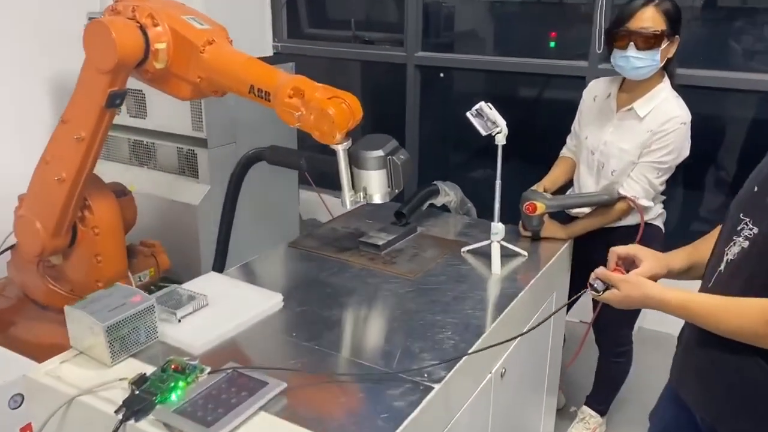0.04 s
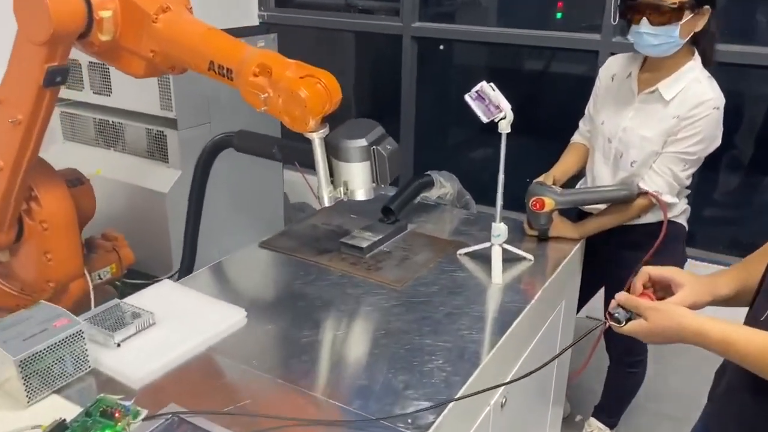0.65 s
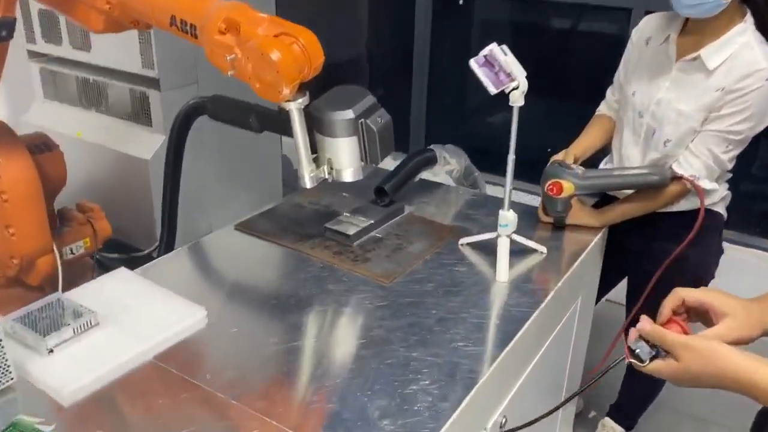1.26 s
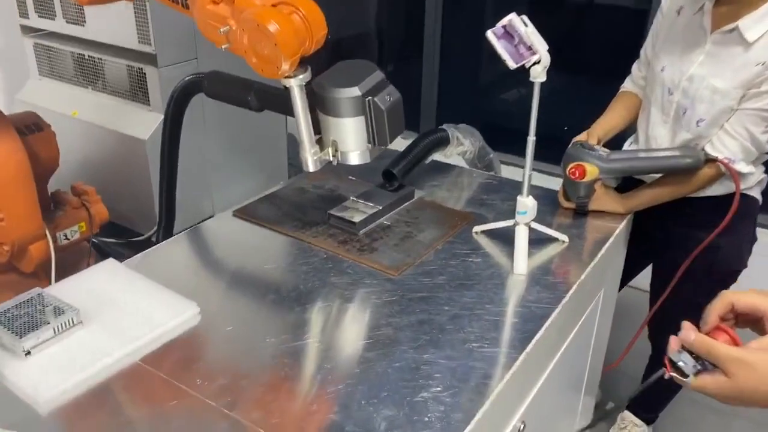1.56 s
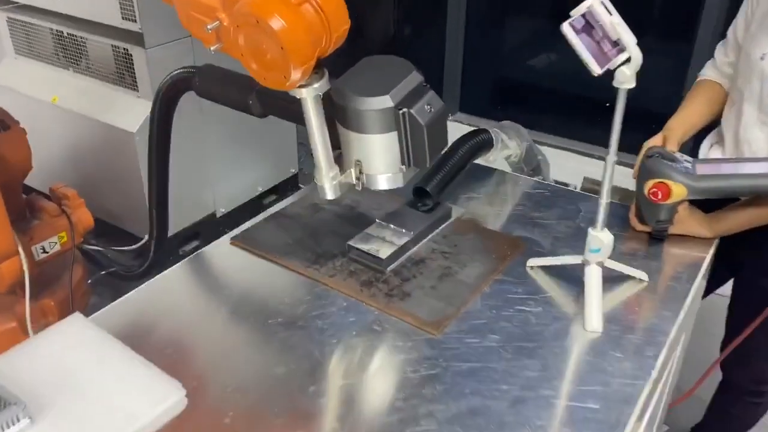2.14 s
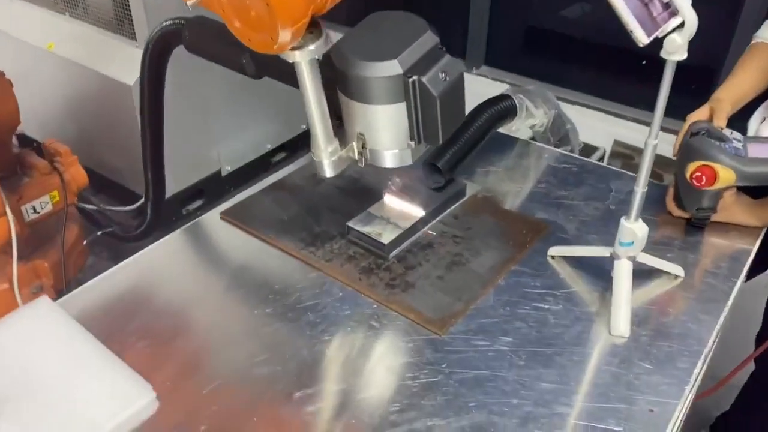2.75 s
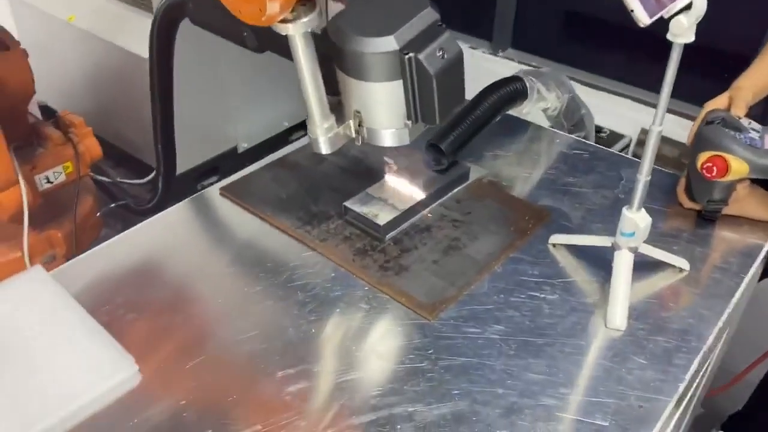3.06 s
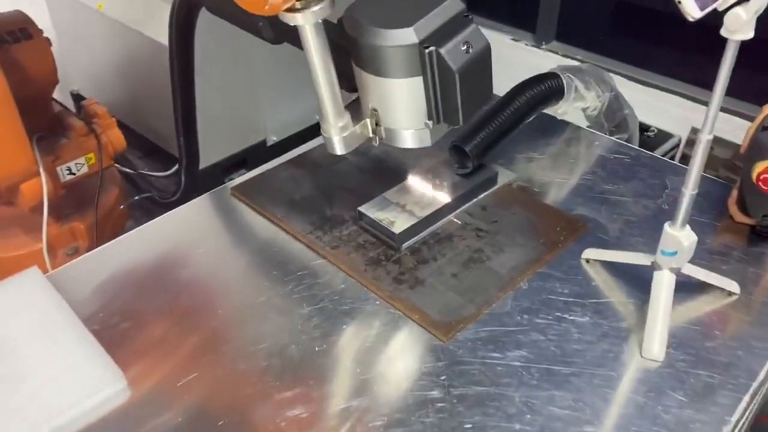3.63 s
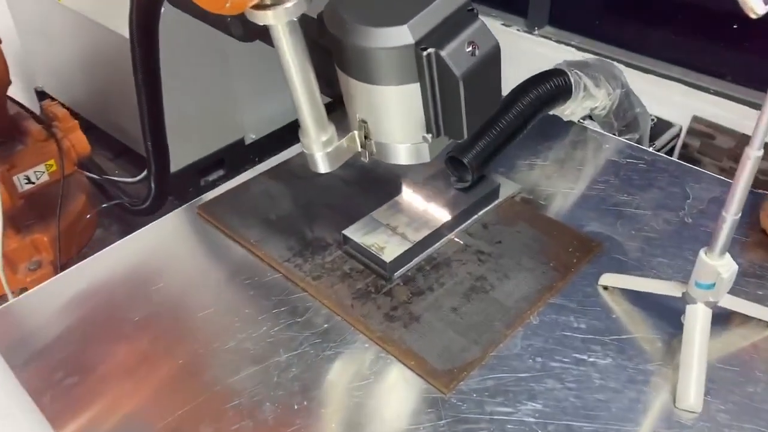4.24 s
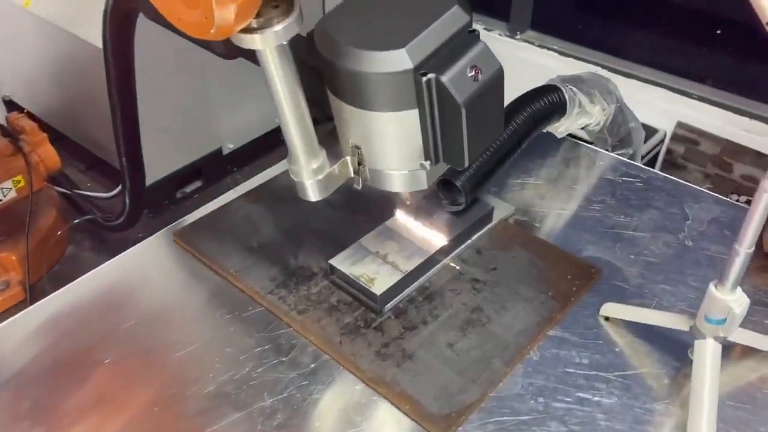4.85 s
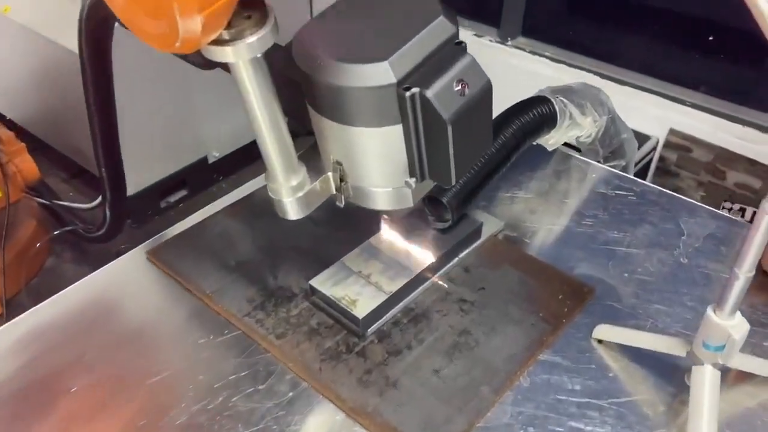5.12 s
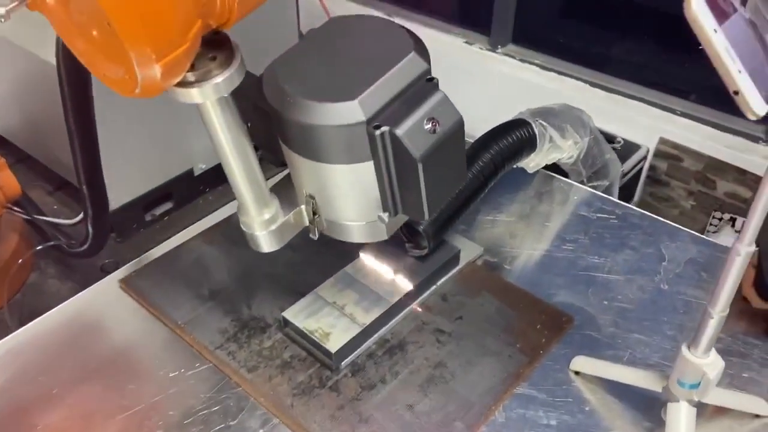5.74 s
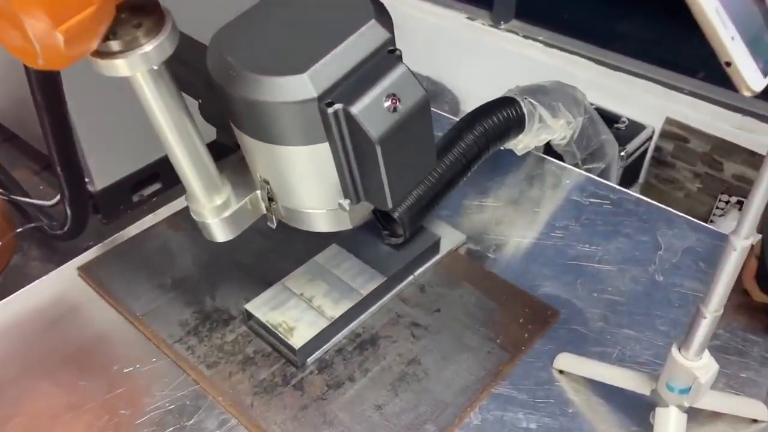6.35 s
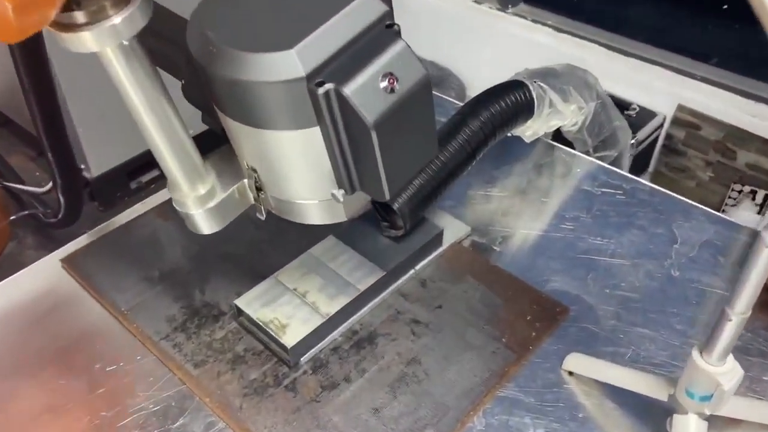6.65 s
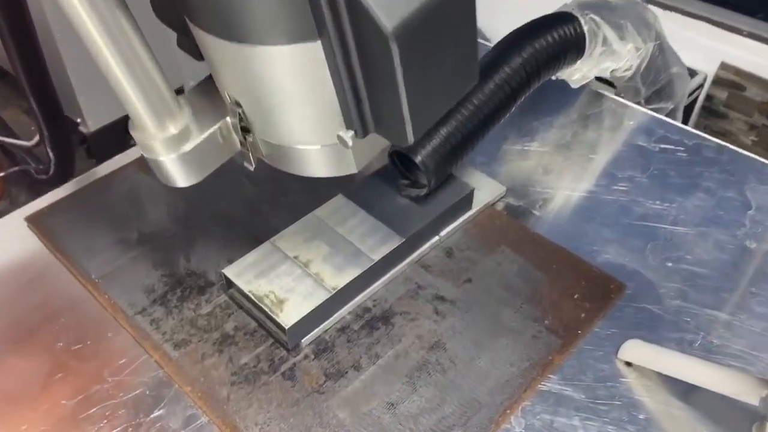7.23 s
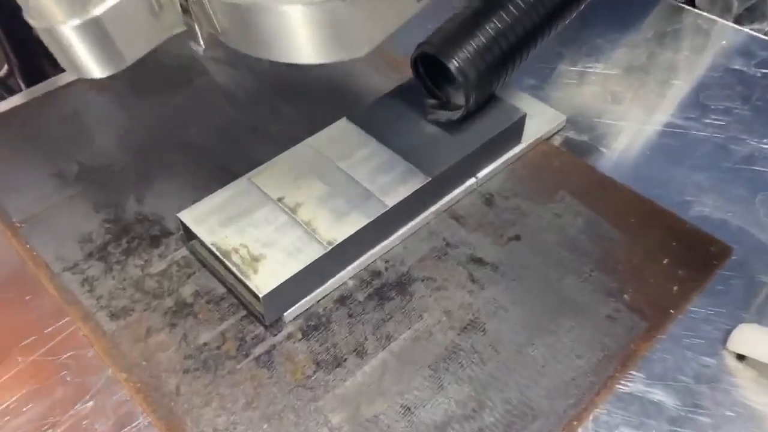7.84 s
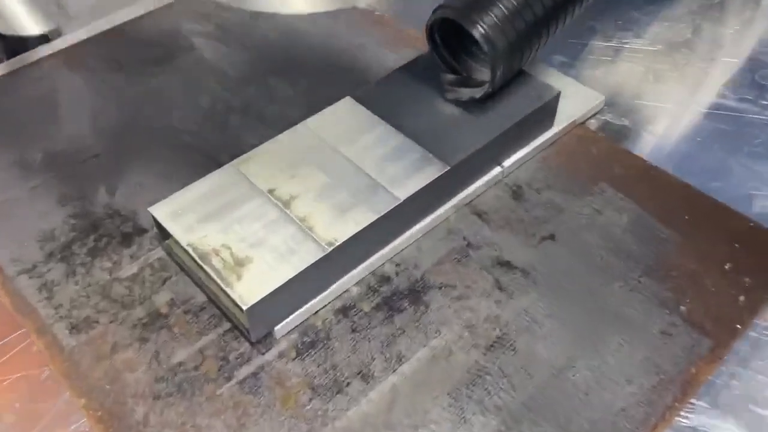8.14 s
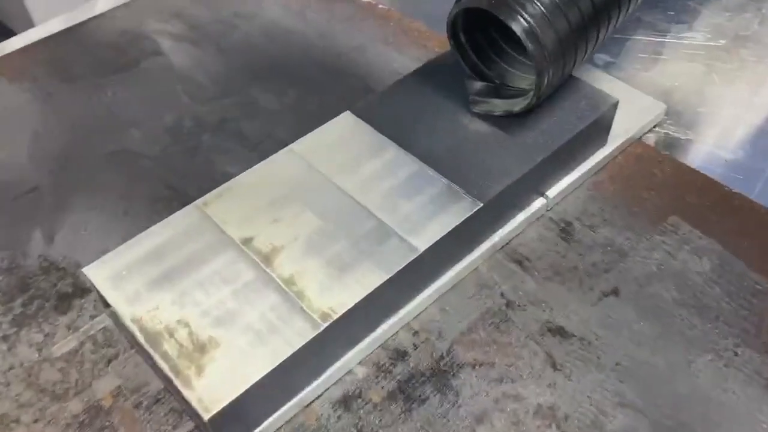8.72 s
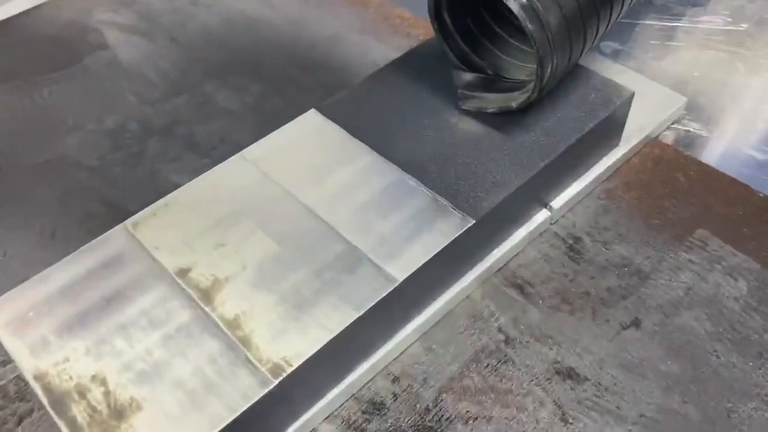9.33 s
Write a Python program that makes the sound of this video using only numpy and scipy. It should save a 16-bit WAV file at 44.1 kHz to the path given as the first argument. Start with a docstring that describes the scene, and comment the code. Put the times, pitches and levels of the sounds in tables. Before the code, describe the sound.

Heard in stereo, carried close to a steel bar in a workshop: first loud, humming fan noise with a clack and a scuff nearby. After about two seconds the fans drop away and a cleaning laser takes over, popping and thumping, then sizzling with a lighter, raspy buzz. Near six seconds it dies out. Quiet fan noise creeps back, along with the faint, airy whistle of an extraction hose.

```python
"""A workshop full of fan and extractor noise, on a stereo pair carried close to a steel bar.
A robot-held cleaning laser strips the bar's coating in puffs of vapour and popping flakes. The beam
sweeps to and fro over nearly the same specks, so its crackle repeats as a raspy buzz.
The far fans sink away as the laser starts and creep back after it stops; a few things clack nearby.
Last, the microphones close in on the faint, hollow whistle of the extraction hose."""
import sys
import numpy as np
from scipy import signal
from scipy.fft import rfft, irfft
from scipy.io import wavfile

SR = 44100
rng = np.random.default_rng(int(sys.argv[2]) if len(sys.argv) > 2 else 0)


def transcribe(u):
    """Save the signal u as a 16-bit wav file named by the first command-line argument.

    u: samples, shape (n,) or (channels, n), limited to [-1, 1]; the rate is SR.
    q: integer samples, one column per channel.
    """
    v = np.clip(np.atleast_2d(u).T, -1, 1)
    q = np.round(v * 32767).astype(np.int16)
    wavfile.write(sys.argv[1], SR, q)


N = 413658
TIME, FREQS = np.arange(N) / SR, np.fft.rfftfreq(N, 1 / SR)

# the workshop's reverberation: (frequency [Hz], time to fall 60 dB [s])
ROOM_T60 = [(100, 0.44), (1000, 0.33), (5000, 0.43), (15000, 0.097)]
# likeness of left and right, for moving air and for echoes: (frequency [Hz], correlation [-1 to 1])
AIR_LIKENESS = [(100, 1), (290, 0.9), (640, 0.44), (1300, 0.11), (3000, 0.39), (6500, 0.28), (12000, 0.038)]
ECHO_LIKENESS = [(60, 0.22), (200, 0.047), (400, 0.37), (700, -0.4), (1300, -0.89), (2500, 0.12),
                 (5000, -0.12), (9000, 1), (15000, -0.49)]
# how the microphones differ, far off and close up: (frequency [Hz], left louder [dB], left leads [rad])
FAR_MICS = [(300, -0.5, 0.27), (850, 3, 0.57), (1410, 0.5, 1), (2000, 1.5, 0.42), (2820, -0.5, .8),
            (3800, 0.5, 0.3), (5400, 5, 0.87), (7000, 0.7, 0.068), (8500, 0.5, 0.34)]
NEAR_MICS = [(100, -0.4, 0), (400, 0.8, 0.089), (720, 4, 0.7), (1440, -3, 0.92), (1910, 1.5, 0),
             (2900, 3, 1), (3970, 2, 0.012), (5260, 3.5, 0.93), (6500, -1, 0.58)]
# far fans before the burn, rows rumble, rush, hiss:
# (level [dB], brief dip [dB], swell [dB], sinks from [s], sink rate [dB/s])
FANS_LOUD = [(-28.5, -7, -.5, 2.265, 244), (-36.5, -4, -0.75, 2.252, 140), (-43.5, -1.5, 2, 2.236, 108)]
# far fans after the burn, same rows: (level [dB], creep [dB/s], step up [dB])
FANS_FAINT = [(-73, 1.86, 12), (-71, 1, 2), (-77, 4, 0)]
# colour of the loud and of the faint fans: (frequency [Hz], relative level [dB])
LOUD_AIR = [(20, -39), (36, -20), (48, -13), (62, -5), (130, -2.5), (250, -3.5), (490, -5.5), (650, -8),
            (1150, -6), (1500, -12), (2700, -16), (3600, -22.5), (7000, -35), (8500, -35.5), (15000, -39.5)]
FAINT_AIR = [(20, -33.5), (37, -23), (48, -14), (68, -13.5), (110, -3.5), (200, -6.5), (260, -8), (370, -5),
             (430, -9.5), (560, -13.5), (1050, -17), (2100, -24), (2800, -26), (4000, -28.5), (4850, -25),
             (6200, -20.5), (7500, -19.5), (14300, -21.5), (15500, -30)]
# narrow fan tones: (frequency [Hz], width [Hz], prominence before the burn [dB], after it [dB])
FAN_TONES = [(113, 4, 5, 0), (145, 7, 4, 3), (168, 7, -8, 0), (204, 8, -4, 1), (345, 14, -3, -8),
             (474, 6, 1, 1), (499, 6, 1, -8), (890, 10, -3, -1), (1178, 8, 4, 2), (1472, 6, 5, 6),
             (1820, 8, 2, -8), (1868, 7, 6, -8), (2164, 6, 7, -8), (2595, 7, -6, 3), (2751, 6, 6, -6),
             (2945, 6, 3, 6), (14120, 14, 5, -8), (14217, 14, 5, -8)]
# hum of a fan's shaft and blades: (frequency [Hz], level before the burn [dB], after [dB], return [s])
FAN_HUM = [(48.5, -48, -68.5, 7.45), (387.4, -44.5, -67, 7.18), (773, -56, -82, 7.4)]
# room resonances along the microphones' path:
# (time [s], half length [s], frequency [Hz], width [Hz], level [dB])
ROOM_BLOOMS = [(0.45, 0.049, 468, 55, -32.5), (0.7, 0.16, 473, 50, -35), (0.58, 0.26, 350, 57, -39),
               (0.35, 0.35, 2850, 350, -53.5), (0.65, 0.14, 834, 330, -41), (1.02, 0.069, 137, 26, -28.5),
               (1.555, 0.55, 390.3, 11, -37.5), (2.15, 0.041, 170, 220, -30), (6.8, 0.56, 2560, 440, -77.5)]
# broad peaks in the colour of the rushing air: (frequency [Hz], width [Hz], lift [dB])
AIR_PEAKS = [(2850, 380, 3.5), (3950, 480, 5), (6700, 1300, 3.5), (10000, 2600, 3.5)]
# air whistling in the hose's mouth: (frequency [Hz], width [Hz], level when nearest [dB])
HOSE_MOUTH = [(3930, 480, -75.5), (6220, 420, -76), (6870, 500, -75.5), (7450, 450, -73.5)]
# clacks, ticks and scuffs around the bench:
# (time [s], level [dB], centre [Hz], half width [octaves], rise [s], time to fall 60 dB [s])
KNOCKS = [(0.1334, -12, 5500, 1.2, 0.0002, 0.021), (0.1388, -8.5, 4000, 1.5, 0.00007, 0.0055),
          (0.1383, -13.5, 1505, 1.9, 0.0001, 0.021), (0.1451, -19, 2600, 1.6, 0.001, 0.12),
          (0.156, -25, 1100, 1.5, 0.0011, 0.08), (1.176, -32.5, 9900, 0.14, 0.0042, 0.065),
          (1.975, -25.5, 5000, 4, 0.0068, 0.29), (1.98, -32.5, 2220, 0.11, 0.0053, 0.26),
          (6.246, -52, 8900, 0.58, 0.00027, 0.021), (6.25, -48, 3970, 0.45, 0.00025, 0.011),
          (6.82, -60.5, 5000, .8, 0.0046, 0.29), (7.769, -56, 1660, 0.61, 0.007, 0.33)]
# colour of one puff of vapour: (frequency [Hz], relative level [dB])
PUFF_COLOUR = [(20, -38), (34, -11.5), (48, -1.5), (90, 1), (150, 0), (280, -3), (550, -8.5), (1000, -16),
               (1900, -19.5), (3000, -25.5), (6000, -31), (8500, -32), (10200, -35.5), (12000, -42.5),
               (14500, -28.5)]
# flakes flashing off; at the coating's ends the beam grazes the same spot once a scan cycle:
# (time [s], relative peak [dB], thump [dB], snap [dB], cycles [count])
POPS = [(2.150, -13.5, 25, 4, 1), (2.232, -13.5, -5, 5, 1), (2.270, -13, 6, -9, 1),
        (2.318, -10.5, 17, 3, 1), (2.323, -12, -11, 1, 2), (2.361, -15.5, 6, -5, 1),
        (2.381, -26, -5, -2, 2), (2.399, -20, 9, 4, 1), (2.409, -15.5, 9, -3, 1), (2.419, -20, 11, 4, 1),
        (2.442, -18, -5, 4, 1), (2.447, -18, 8, -3, 1), (2.583, -14.5, 11, 1, 1), (2.648, -17.5, 13, 4, 1),
        (2.728, -25, 18, 0, 1), (2.768, -18.5, 18, 9, 1), (2.855, -22, 24, 4, 2), (2.926, -13.5, 29, 1, 1),
        (2.963, -19, 14, -1, 1), (2.983, -21, 8, 4, 1), (3.004, -27, 0, 15, 1), (3.035, -26, 6, 10, 1),
        (3.328, -28, -4, 3, 1), (3.416, -24.5, -8, 6, 1), (4.582, -35, 9, 6, 3), (4.646, -27, -3, 15, 1),
        (4.800, -28, 5, 6, 1), (4.948, -30, 3, 10, 1), (5.014, -29, 3, 6, 1), (5.103, -24, -5, -3, 1),
        (5.145, -28, 6, -4, 2), (5.729, -28, 7, 1, 1), (5.7494, -29, -3, 11, 5), (5.7536, -29, 3, 12, 4),
        (5.7642, -33.5, 4, 3, 5), (5.772, -25.5, -2.5, 3, 5), (5.7772, -29, -2, 1, 5),
        (5.7811, -30, -2, 4, 4), (5.988, -34.5, -13, 2, 1), (6.031, -42, -16, -1, 1)]
# overtones of the sweep: (multiple of the scan rate [ratio], level relative to the spit band [dB])
SCAN_TONES = [(2, -11), (4, -5.5), (6, -8.5), (7, -22), (8, -5), (10, -13), (11, -16.5), (12, -6.5),
              (14, -16), (16, -18.5), (18, -24), (19, -20), (20, -17), (22, -16), (24, -9), (26, -15.5),
              (27, -18), (28, -23), (30, -22), (36, -17.5)]
# how alike the surface is a cycle later, and on the next track: (frequency [Hz], likeness [0 to 1])
CYCLE_MEMORY = [(100, 0.6), (500, 0.38), (1200, 0.16), (3000, 0.065), (10000, 0.22)]
TRACK_MEMORY = [(100, 0.58), (600, 0.062), (2000, 0.0457), (5000, 0.022)]
# the close burn, rows thud, puffing, spit, rasp, sizzle: (level [dB], extra on the heavy stretch [dB],
# settling [s], share of plume swell [0 to 1], of rasp swell [0 to 1], fades from [s], fade rate [dB/s])
BURN_BANDS = [(-40.5, 13.5, 0.033, 0.9, 0.15, 5.70, 175), (-47.5, 12.5, 0.18, 0.16, 0.049, 5.70, 165),
              (-46.5, 5, 0.33, 0.033, 0.78, 5.71, 145), (-49, 2, 0.21, 0.083, 0.88, 5.71, 117),
              (-49, 3, .3, 0.068, 0.27, 5.64, 40.5)]
# swells of the plume and of the rasp, each taken about its mean: (time [s], level [dB])
PLUME_SWELL = [(3.1, -35.5), (3.2, -32.5), (3.3, -39), (3.45, -34), (3.6, -35), (3.78, -39), (3.88, -33.5),
               (4.03, -31.5), (4.22, -38), (4.4, -35.5), (4.6, -32), (4.75, -44.5), (4.88, -36.5),
               (5.1, -32.5), (5.35, -34), (5.5, -38), (5.7, -35)]
RASP_SWELL = [(3.12, -41), (3.28, -45), (3.48, -43), (3.6, -44), (3.75, -42.5), (3.95, -42.5),
              (4.12, -43.5), (4.23, -41.5), (4.36, -44.5), (4.5, -42.5), (4.65, -43), (4.76, -43.5),
              (4.9, -43), (5.12, -43), (5.32, -45.5), (5.5, -43), (5.7, -44)]

FAN_EDGES_HZ, BURN_EDGES_HZ = (600, 5000), (300, 650, 1500, 5000)  # where the bands meet
BRIGHTEN_S, BRIGHTEN_TAKES_S = 1.06, 0.38  # the air turns brighter
SCAN_HZ, SCAN_START_S = 23.125, 2.2027
BURN_FULL_S, BURN_RISE_DB_PER_S = 2.46, 187  # the beam slides onto the coating
HEAVY_END_S = 2.98  # end of the first, heavily burning stretch


def gain_of(db):
    """Decibels to amplitude."""
    return 10 ** (np.asarray(db) / 20)


def unit_rms(x):
    """Scales a sound so that its channel average has rms 1."""
    return x / np.sqrt(np.mean(np.atleast_2d(x).mean(0) ** 2) + 1e-20)


def read(points, hz):
    """Reads a table on a log-frequency axis."""
    f, value = np.transpose(points)
    return np.interp(np.log(hz + 1), np.log(f + 1), value)


def add(mix, s, sound):
    """Mixes a sound in at time s."""
    part = mix[round(s * SR):][:len(sound)]
    part += sound[:len(part)]


def step(at_s, takes_s):
    """A smooth change from 0 to 1, centred on a moment."""
    return (1 + np.tanh(2 * (TIME - at_s) / takes_s)) / 2


def fade_in(full_s, db_per_s):
    """A level in dB that climbs to 0 and stays there."""
    return -db_per_s * np.maximum(full_s - TIME, 0)


def fade_out(from_s, db_per_s):
    """A level in dB that holds at 0, then falls."""
    return -db_per_s * np.maximum(TIME - from_s, 0)


def resonance(hz, width_hz, slope=2):
    """A spectral peak of height 1."""
    return 1 / (1 + (2 * (FREQS - hz) / width_hz) ** slope)


def noise(colour, shape=N):
    """Noise with the given amplitude spectrum."""
    return irfft(rfft(rng.standard_normal(shape)) * colour)


def ride(x, levels, edges_hz, normalise=unit_rms):
    """Splits a sound into bands and lets each follow its level in dB."""
    lowpasses = [1 / (1 + (FREQS / edge) ** 8) for edge in edges_hz]
    shares = np.diff([np.zeros_like(FREQS), *lowpasses, np.ones_like(FREQS)], axis=0)
    spectrum = rfft(x)
    return sum(normalise(irfft(spectrum * share, N)) * gain_of(db) for share, db in zip(shares, levels))


def diffuse(pair, likeness):
    """Sound from all round: the two microphones hear it more or less alike at each frequency."""
    same = np.clip(read(likeness, FREQS), -1, 1)
    a, b = rfft(pair)
    mid, side = a * np.sqrt((1 + same) / 2), b * np.sqrt((1 - same) / 2)
    return irfft(np.array([mid + side, mid - side]), N)


def microphones(pair, table):
    """Gives the two microphones their difference in level and phase."""
    left_db, lead = (read(np.array(table)[:, [0, k]], FREQS) for k in (1, 2))
    half = gain_of(left_db / 2) * np.exp(1j * lead / 2)
    return irfft(rfft(pair) * np.array([half, 1 / half]), N)


def room(x, wet_db, drift_hz=1.1, size=14000, count=4):
    """Direct sound plus a diffuse tail; the echoes drift as the microphones are carried about."""
    hz, t, spectra = signal.stft(rng.standard_normal((count, 2, size)), SR, nperseg=256)
    decay = gain_of(-60 * t / read(ROOM_T60, hz)[:, None]) * (t > .002)
    tails = signal.istft(spectra * decay, SR, nperseg=256)[1]
    wet = np.zeros((2, N))
    for k, tail in enumerate(tails):
        share = np.maximum(np.cos(2 * np.pi * (drift_hz * TIME - k / count)), 0)
        wet += signal.oaconvolve((x * share)[None], tail / np.linalg.norm(tail[0]), axes=1)[:, :N]
    return x + gain_of(wet_db) * diffuse(wet, ECHO_LIKENESS)


def loud_fan_levels(dip_s=0.27, dip_width_s=.085):
    """The fans dip briefly after the first clack, brighten, and sink away as the laser starts."""
    dip = np.exp(-((TIME - dip_s) / dip_width_s) ** 2)
    brighten = step(BRIGHTEN_S, BRIGHTEN_TAKES_S)
    return [db + dip_db * dip + swell_db * brighten + fade_out(sink_s, rate)
            for db, dip_db, swell_db, sink_s, rate in FANS_LOUD]


def faint_fan_levels(from_s=6.25):
    """After the burn the fans creep back, the hiss steadily and the rumble mostly in one step."""
    arrive, opened = fade_in(from_s, db_per_s=5), step(at_s=7.2, takes_s=0.52)
    return [db + arrive + creep * (TIME - from_s) + step_db * opened for db, creep, step_db in FANS_FAINT]


def fans(colour, levels, tones, tones_db):
    """Far off, all round: rushing air with a few broad peaks, and the narrow tones of several fans."""
    tone_power = sum((gain_of(db + tones_db) * resonance(hz, width)) ** 2 for hz, width, db in tones)
    hose_db = sum(db * resonance(hz, width) for hz, width, db in AIR_PEAKS)
    spectrum = gain_of(read(colour, FREQS) + hose_db) * np.sqrt(1 + tone_power)
    air = unit_rms(diffuse(noise(spectrum, (2, N)), AIR_LIKENESS))
    return ride(air, levels, FAN_EDGES_HZ)


def fan_hum(waver_db=2.0, waver_hz=6.0):
    """The wavering hum of shaft and blades sinks with the rumble; its tones return after the burn."""
    sink_db = loud_fan_levels()[0] - FANS_LOUD[0][0]
    hum = np.zeros(N)
    for hz, before_db, after_db, back_s in FAN_HUM:
        level = gain_of(before_db + sink_db) + gain_of(after_db) * step(back_s, takes_s=0.42)
        hum += level * np.sqrt(2) * np.sin(2 * np.pi * (hz * TIME + rng.random()))
    waver = unit_rms(noise(np.exp(-(FREQS / waver_hz) ** 2)))
    return hum * gain_of(waver_db * waver)


def air_hiss(centre_hz=14200, spread_hz=900, level_db=-52, swell_db=9):
    """A high band of air hiss, unrelated in the two microphones, swells before the burn."""
    band = np.exp(-.5 * ((FREQS - centre_hz) / spread_hz) ** 2)
    db = level_db + swell_db * step(BRIGHTEN_S, BRIGHTEN_TAKES_S) + fade_out(2.12, db_per_s=55)
    return unit_rms(noise(band, (2, N))) * gain_of(db)


def room_blooms():
    """Bands of machine noise swell and sink as the microphones pass through room resonances."""
    out = np.zeros(N)
    for s, half_s, hz, width, db in ROOM_BLOOMS:
        band = unit_rms(noise(resonance(hz, width, slope=4)))
        out += gain_of(db) * band * np.exp(-((TIME - s) / half_s) ** 2)
    return out


def hose_mouth(nearest_s=9.2, approach_db_per_s=6.5):
    """Air drawn into the open hose rings its resonances, louder as the microphones close in."""
    colour = sum(gain_of(db) * np.sqrt(SR / 2 / width) * resonance(hz, width, slope=4)
                 for hz, width, db in HOSE_MOUTH)
    suction = diffuse(noise(colour, (2, N)), AIR_LIKENESS)
    return suction * gain_of(fade_in(nearest_s, approach_db_per_s))


def knocks(size=16384):
    """Short contacts near the microphones: each a burst in one band that dies quickly."""
    out, t = np.zeros(N), np.arange(size) / SR
    hz = np.fft.rfftfreq(size, 1 / SR) + 1
    for s, db, centre, octaves, rise, t60 in KNOCKS:
        band = 1 / (1 + (np.log2(hz / centre) / octaves) ** 2)
        envelope = (1 - np.exp(-t / rise)) * gain_of(db - 60 * t / t60)
        add(out, s, unit_rms(noise(band, size)) * envelope)
    return out


def specks(per_s, spread_db):
    """Specks of coating: randomly timed kicks of uneven size."""
    sizes = gain_of(spread_db * np.minimum(rng.exponential(1, N), 3))
    kicks = sizes * (rng.random(N) < per_s / SR)
    return unit_rms(kicks - kicks.mean())


def puff(extra_db, lag_cycles=1.7, size=8192):
    """One burst of vapour, coloured by extra_db(hz): a snap that sinks in pitch as the plume swells."""
    two_sided_hz = abs(np.fft.fftfreq(size, 1 / SR))
    log_gain = np.log(gain_of(read(PUFF_COLOUR, two_sided_hz) + extra_db(two_sided_hz)))
    minimum_phase = np.exp(np.conj(signal.hilbert(log_gain)))
    click = np.fft.ifft(minimum_phase).real[:size // 2]
    lows_last = (1 + np.fft.rfftfreq(size, 1 / SR) / 150) ** (-2j * np.pi * lag_cycles)
    return -irfft(rfft(click, size) * lows_last)


def smoke(top_hz=110, level_db=-30.0):
    """Big, dull puffs of smoke that keep no rhythm, on the first stretch of the bar."""
    dull = puff(lambda hz: -10 * np.log10(1 + np.minimum(hz / top_hz, 20) ** 4))
    rumble = unit_rms(signal.oaconvolve(specks(per_s=200, spread_db=2.5), dull)[:N])
    db = level_db + fade_in(BURN_FULL_S, BURN_RISE_DB_PER_S) + fade_out(2.97, db_per_s=700)
    return rumble * gain_of(db)


def flake_pops(thump_hz=1100, snap_hz=1850, snap_width_hz=650, trim_db=-4, wear_db=-1.67):
    """Flakes flash off with a puff and a snap; some pop again, weaker as each pass finds less left."""
    out = np.zeros(N)
    for s, db, thump_db, snap_db, cycles in POPS:
        pop = puff(lambda hz: thump_db / (1 + (hz / thump_hz) ** 2)
                   + snap_db / (1 + ((hz - snap_hz) / snap_width_hz) ** 2))
        pop /= abs(pop).max()
        for k in range(round(cycles)):
            add(out, s + k / SCAN_HZ, gain_of(db + trim_db + k * wear_db) * pop)
    return out


def swell(curve):
    """A level curve in dB about its own mean; 0 before it begins."""
    s, db = np.transpose(curve)
    return np.interp(TIME, s, db - db.mean()) * step(s[0], .1)


def burn_levels():
    """The burn starts heavy, settles, swells with its plume and fades as the beam leaves the coating."""
    plume_db, rasp_db = swell(PLUME_SWELL), swell(RASP_SWELL)
    arrive = fade_in(BURN_FULL_S, BURN_RISE_DB_PER_S)
    levels = []
    for db, extra_db, settle_s, plume, rasp, fade_s, rate in BURN_BANDS:
        heavy = 1 - step(HEAVY_END_S + settle_s / 4, settle_s)
        swell_db = plume * plume_db + rasp * rasp_db
        levels.append(db + arrive + extra_db * heavy + swell_db + fade_out(fade_s, rate))
    return levels


def scan_tones(heavy_db=5):
    """The even part of the buzz: overtones of the sweep that follow the spitting of the burn."""
    tones = sum(gain_of(db) * np.sqrt(2) * np.sin(2 * np.pi * (round(k) * SCAN_HZ * TIME + rng.random()))
                for k, db in SCAN_TONES)
    spit_db, heavy = burn_levels()[2], 1 - step(HEAVY_END_S, .1)
    return tones * gain_of(spit_db + heavy_db * heavy)


def coating(flake_hz=1700, grit_db=-8, haze_db=-11):
    """Under the beam: the same spots come round each cycle, some also on the neighbouring track."""
    slow_pop = 1 / (1 + 1j * FREQS / flake_hz) ** 2  # large flakes make the lows, fine grit the sizzle
    flakes = rfft(specks(per_s=650, spread_db=2.0)) * slow_pop
    grit = gain_of(grit_db) * specks(per_s=2600, spread_db=5.5)
    haze = gain_of(haze_db) * rng.standard_normal(N)
    power = abs(slow_pop) ** 2 + gain_of(grit_db) ** 2 + gain_of(haze_db) ** 2
    surface = (flakes + rfft(grit + haze)) / np.sqrt(power)
    half_cycle = np.exp(-1j * np.pi * FREQS / SCAN_HZ)  # the delay from one track to the next
    again, beside = (np.clip(read(table, FREQS), 0, .95) for table in (CYCLE_MEMORY, TRACK_MEMORY))
    repeats = np.sqrt(1 - again ** 2) / (1 - again * half_cycle ** 2)
    tracks = (1 + beside * half_cycle) / np.sqrt(1 + beside ** 2)
    return unit_rms(irfft(surface * repeats * tracks, N))


def constant_power(x, over_s=.11):
    """A steady beam lifts coating at a steady rate: chance surges even out, the fine crackle stays."""
    power = signal.oaconvolve((x ** 2).mean(0), np.hanning(round(2 * over_s * SR)), "same")
    return unit_rms(x / np.sqrt(np.maximum(power, 1e-20)))


def laser(duty=.74, bite_strokes=0.042, return_db=-3, sizzle_db=-11):
    """Close up, four strokes a cycle blow off vapour; the beam is dark at each turn."""
    strokes = (TIME - SCAN_START_S) * SCAN_HZ * 4
    along, returning = strokes % 1, np.floor(strokes) % 2
    bite = 1 + np.exp(-along / bite_strokes)  # hardest as the beam comes back on
    beam = (along < duty) * bite * gain_of(return_db * returning)
    sizzle = gain_of(sizzle_db) * np.diff(rng.standard_normal(N + 1))  # hot plume, even in the turns
    vapour = beam * coating() + sizzle
    burn = signal.oaconvolve(vapour - vapour.mean(), puff(np.zeros_like))[:N]
    return ride(room(burn, wet_db=-3), burn_levels(), BURN_EDGES_HZ, constant_power)


def scene():
    """Fans far off and all round; the burn and the knocks close to the microphones."""
    tones = np.array(FAN_TONES)
    far = fans(LOUD_AIR, loud_fan_levels(), tones[:, [0, 1, 2]], tones_db=5.0)
    far += air_hiss() + room_blooms()
    far += fans(FAINT_AIR, faint_fan_levels(), tones[:, [0, 1, 3]], tones_db=4.0)
    far += fan_hum() + hose_mouth()
    near = laser() + scan_tones() + room(smoke() + flake_pops() + knocks(), wet_db=-11.5)
    return microphones(far, FAR_MICS) + microphones(near, NEAR_MICS)


def record(dry):
    """The recorder folds the treble nearly to mono, widens it by a small delay and limits the band."""
    mono_hz, treble_db, side_kept = 7500, 2.5, 0.023
    widen_from_hz, delay_s, top_hz = 6520, .000271, 15600
    left, right = rfft(dry)
    treble = 1 / (1 + (mono_hz / (FREQS + 1)) ** 10)
    mid = (left + right) / 2 * gain_of(treble_db * treble)
    side = (left - right) / 2 * (1 - treble + side_kept * treble)
    turn = np.exp(-1j * np.pi * delay_s * np.maximum(FREQS - widen_from_hz, 0))
    wide = irfft(np.array([(mid + side) * turn, (mid - side) / turn]), N)
    lowpass = signal.firwin(511, top_hz, window=("kaiser", 9), fs=SR)
    return signal.oaconvolve(wide, lowpass[None], "same")


dry = scene()
out = record(dry)
transcribe(out)
```